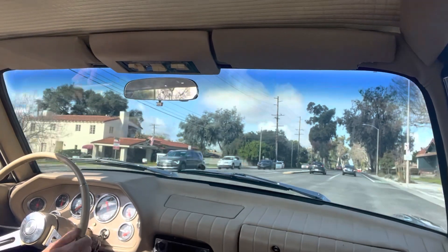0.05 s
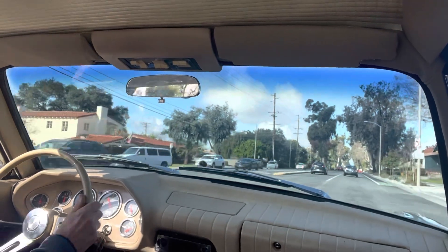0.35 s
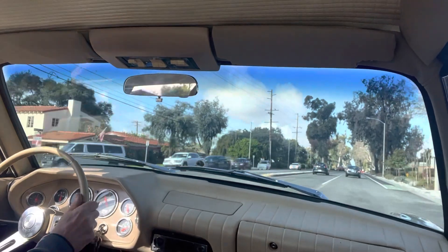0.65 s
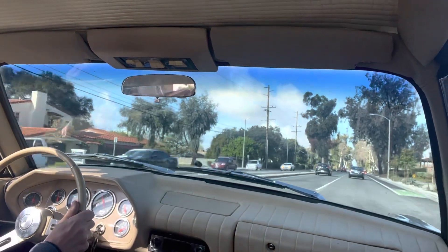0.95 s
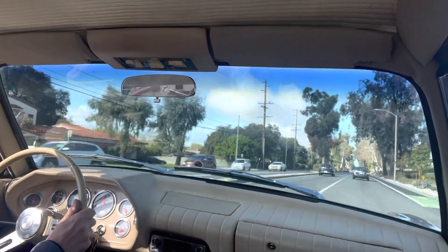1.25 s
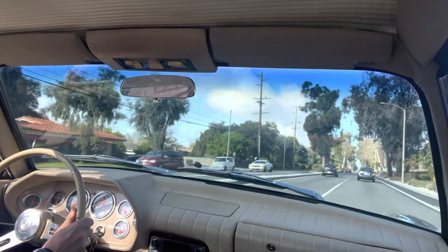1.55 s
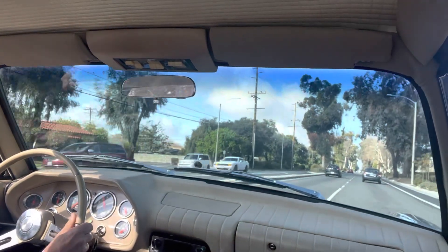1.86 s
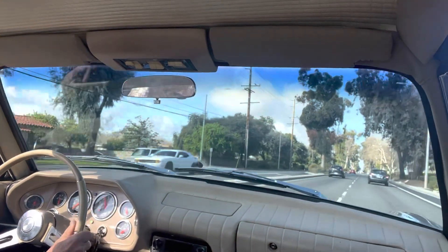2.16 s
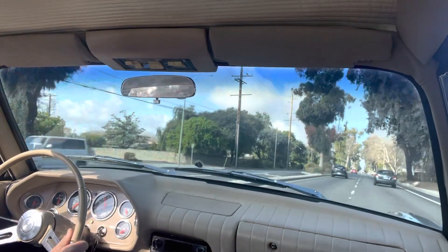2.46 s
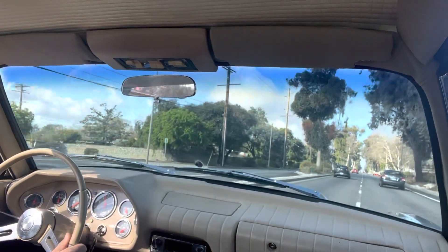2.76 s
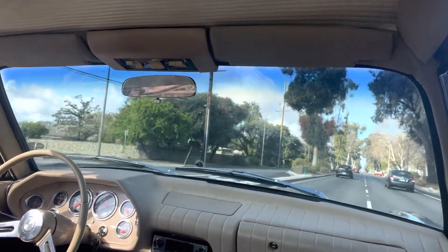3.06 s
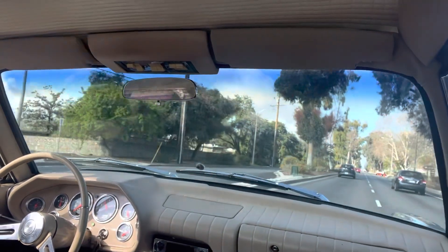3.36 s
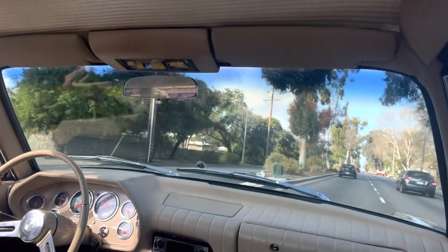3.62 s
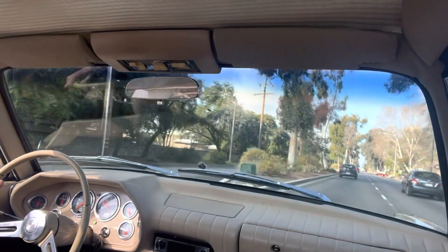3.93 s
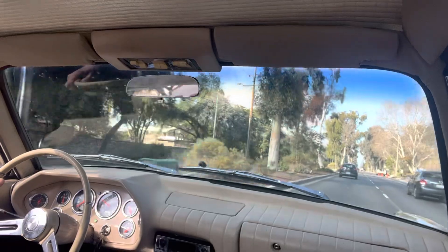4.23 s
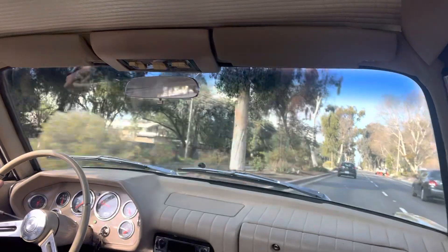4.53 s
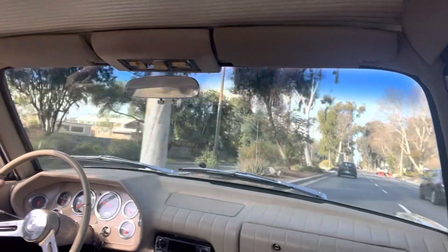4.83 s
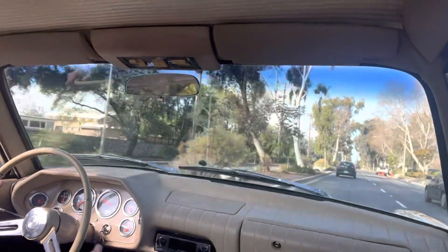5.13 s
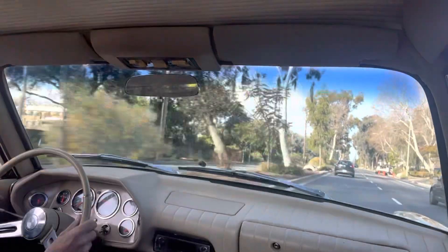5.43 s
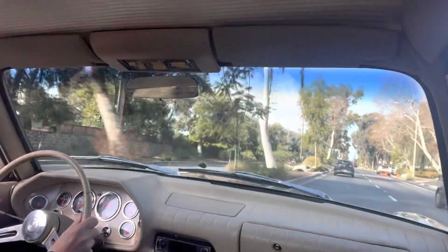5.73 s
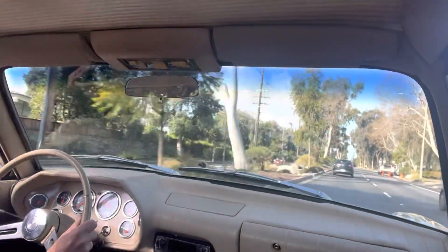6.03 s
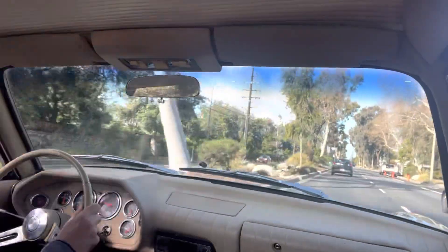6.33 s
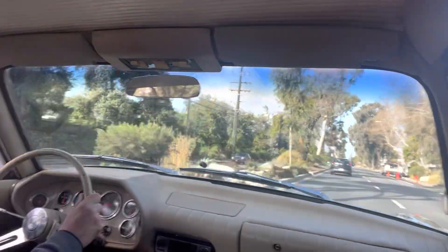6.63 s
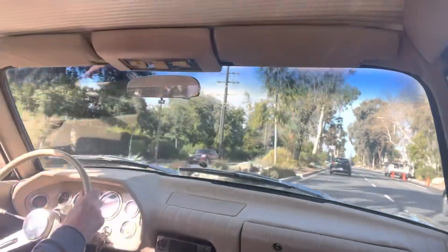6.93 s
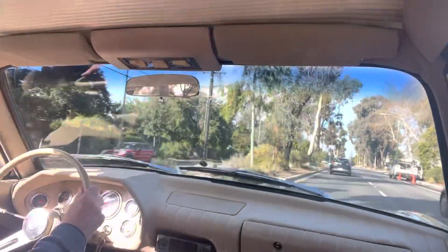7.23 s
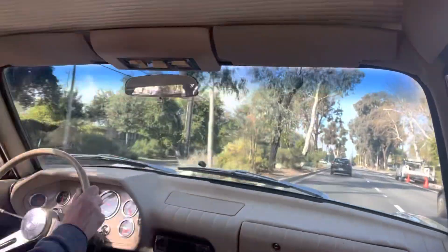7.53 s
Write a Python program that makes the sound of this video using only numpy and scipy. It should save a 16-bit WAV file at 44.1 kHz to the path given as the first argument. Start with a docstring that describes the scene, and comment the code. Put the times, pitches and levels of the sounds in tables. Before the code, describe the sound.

A supercharged V8 accelerates hard, heard from the front seat of an old car. The exhaust booms through the cabin under rushing intake air and a thin rising whine. After three seconds the throttle closes and the revs fall, followed by a quick double whoosh and a hollow thud. The car rolls on with an uneven low rumble, tyre noise and a faint high squeak.

```python
"""A supercharged V8 pulls hard for three seconds, heard inside an old coupe. Exhaust orders boom through
cabin resonances under the blower's whine and the rush of intake air. The throttle closes, the revs fall,
and a short double whoosh ends in a panel thud. The car rolls on with an uneven low rumble, tyre noise
and a faint squeak of something rubbing as the body shakes."""
import sys
import numpy as np
from scipy import signal
from scipy.io import wavfile

SR = 44100
rng = np.random.default_rng(int(sys.argv[2]) if len(sys.argv) > 2 else 0)


def unload_audio(sound):
    """Save the sound as a 16-bit wav file, at the path given as the first command line argument."""
    columns = np.transpose(np.atleast_2d(sound))
    # keep every value between -1 and 1, then stretch to whole-number steps
    steps = np.round(np.clip(columns, -1, 1) * 32767)
    wavfile.write(sys.argv[1], SR, steps.astype(np.int16))


N = 334278

# engine speed in four-stroke cycles; an order is a multiple of it: time_s, cycle_hz
ENGINE_SPEED = [(0, 25.9), (.12, 24.25), (.24, 23.35), (.34, 24.3), (.43, 24.35), (.5, 23.8), (.63, 24.7),
                (.8, 24.6), (.95, 25.3), (1.08, 25.3), (1.22, 25.76), (1.44, 26.04), (1.57, 26.84),
                (1.72, 26.72), (1.85, 27.84), (2.0, 27.8), (2.15, 28.76), (2.3, 29.04), (2.45, 29.9),
                (2.7, 30.72), (2.95, 31.36), (3.07, 31), (3.2, 28.4), (3.3, 26), (3.42, 24.24), (3.9, 19.2),
                (4.15, 16.2), (4.5, 14.3), (5.0, 15.5), (5.5, 15.7), (7.58, 12.6)]
# engine load: time_s, load_db
ENGINE_LOAD = [(0, 1), (.9, 0), (1.3, -1), (1.9, 1.5), (2.5, 1), (2.98, -0.4), (3.25, -10), (3.9, -13),
               (4.15, -23), (5.0, -17), (7.3, -13.5)]
# exhaust pattern of the unevenly firing banks: order, level_db
EXHAUST_ORDERS = [(2, -34), (3, -28), (4, -31), (5, -27), (6, -19), (7, -26), (8, -24), (9, -29),
                  (10, -32.5), (11, -26), (12, -32.5), (13, -29), (14, -36.5), (15, -41), (16, -35.5),
                  (17, -38.5), (18, -43), (19, -39), (20, -37.5), (21, -41.5)]
# orders that follow the load only partly: order, load_share
EXHAUST_LOAD_SHARES = [(3, 0.99), (4, 0.89), (5, 0.86), (6, 0.99)]
# bark midway through the pull: order, boost_db
BARK_BOOSTS = [(8, 10.8), (11, 1.9)]
# cabin response to the exhaust: freq_hz, gain_db
CABIN_RESPONSE = [(30, -4), (45, 17), (58, 14), (72, 8), (82, 3), (94, 4), (108, 6), (122, 2.5), (138, -3),
                  (150, 3.5), (162, -1), (176, -13), (195, -10.5), (213, -11.5), (233, -5), (282, -4),
                  (320, -7), (400, 0), (500, -2.5), (650, -11.5)]
# standing waves, left versus right: freq_hz, phase_rad, pan_db
STEREO_OFFSETS = [(50, 0.13, 1.5), (86, 0.65, 2), (136, 0.37, -5), (168, 0.26, 5), (230, 1.04, -6.5),
                  (295, 0.8, -6.5), (440, 1.88, -4.5), (958, 1.23, -5.5), (3500, 0.77, 4.5)]
# left-right likeness of noise, clipped to +-1 in use: freq_hz, correlation
STEREO_CORRELATION = [(40, 0.74), (70, 0.9), (130, 0.77), (250, 0.47), (400, -0.17), (600, 0.11),
                      (1200, -0.34), (2700, 0.049), (6000, -0.18), (8000, 0.24), (10200, 1), (12500, -1.4)]
# cabin peaks and hollows for airborne noise: centre_hz, width_hz, gain_db
CABIN_PEAKS = [(284, 31, -4), (388.4, 35, 6), (638, 27, -11.5), (719, 19, 2), (839, 166, 6), (940, 56, 1.5),
               (1243, 103, 3), (2030, 210, 3), (2450, 190, 3), (4770, 180, 2.5)]
# engine notes that swell at a resonance: order, centre_hz, width_hz, peak_db, load_share
DRONE_RESONANCES = [(34.17, 954, 100, -33.5, 1.5), (30.4, 940, 29, -35.5, 9), (48, 1262, 90, -45, 1),
                    (18, 284, 30, -35.5, 0), (8.04, 107, 18, -27, 0), (6, 77, 8.1, -31, 0),
                    (5, 65, 14, -25.5, 0)]
# intake roar spectrum: freq_hz, density_db
ROAR_SPECTRUM = [(150, -31), (280, -8), (500, 8), (630, -1.5), (780, -1.5), (950, -1.5), (1250, -6.5),
                 (1600, -10.5), (2500, -15), (4000, -28), (6000, -28)]
# intake hiss spectrum: freq_hz, density_db
HISS_SPECTRUM = [(1500, -8.5), (3000, 5.5), (5000, 0), (7000, 0.5), (9000, -1), (10500, 0.5), (12000, -5),
                 (13000, -3.5)]
# engine bay resonances: centre_hz, gain_db
BAY_MODES = [(510, 3.5), (730, 1.5), (930, -5), (1170, -8)]
# resonances the whine sweeps through: centre_hz, width_hz, gain_db
BLOWER_RESONANCES = [(3070, 140, -2), (3228, 91, 11), (3480, 55, 4)]
# whine spurts and dips as the throttle moves: start_s, attack_s, hold_s, release_s, gain_db
BLOWER_SPURTS = [(.08, .015, .03, .015, 6), (.14, .02, .1, .02, -8), (.305, .015, .11, .03, 13),
                 (.536, .026, .06, .02, 9), (.65, .01, .05, .01, -6), (.72, .03, .09, .02, 9.5),
                 (1.15, .05, .25, .04, 2), (2.7, .2, .15, .06, 7.5), (3.24, .04, .05, .04, 4),
                 (3.34, .04, .04, .03, 8)]
# tyre rumble spectrum: freq_hz, density_db
RUMBLE_SPECTRUM = [(22, -24), (32, -13), (48, -5.5), (68, -3), (100, -9.5), (160, -11), (200, -14.5),
                   (270, -13.5), (330, -24), (420, -19)]
# body resonance in the shudder: centre_hz, width_hz, gain_db
SHUDDER_PEAKS = [(100, 23, 13)]
# wind and tyre noise spectrum: freq_hz, density_db
RUSH_SPECTRUM = [(330, -13.5), (460, -1), (650, -9), (900, -8), (1200, -11), (1700, -18.5), (2500, -19.5),
                 (4000, -26), (6000, -33), (7700, -34), (10000, -34), (11500, -33.5), (13000, -41)]
# loudest squeaks: time_s, peak_db
SQUEAK_CHIRPS = [(.202, -46), (1.38, -50), (1.48, -45), (1.56, -48), (3.475, -50), (3.525, -44),
                 (3.615, -46), (3.665, -42), (3.715, -44), (3.765, -43.5), (3.87, -56), (4.29, -62),
                 (4.365, -49), (5.09, -52), (5.15, -50.5), (5.22, -52)]
# fainter squeaking: start_s, hold_s, level_db
SQUEAK_BOUTS = [(-.3, 1.87, -54), (3.2, 0.76, -56), (4.55, 1.5, -57.5)]
# air at the closing throttle: start_s, attack_s, release_s, pitch_hz, width_hz, level_db
WHISTLE_BANDS = [(2.1, 1, 0.4, 2550, 315, -43.5), (3.05, .025, 0.033, 2970, 70, -35.5)]
# wavering notes on the overrun: order, level_db
OVERRUN_ORDERS = [(2, -28.5), (3, -25), (5, -27.5)]
# loudest swells of the low rumble, near 65 Hz: time_s, level_db, pitch_hz
RUMBLE_SWELLS = [(3.46, -12.5, 66.2), (3.76, -21, 66), (3.86, -15, 72.8), (3.94, -14, 60.5),
                 (4.09, -22, 63.2), (4.27, -19, 58), (4.4, -25, 64.8), (4.54, -20, 64), (4.7, -19.5, 53),
                 (4.92, -18, 66), (5.04, -22, 64), (5.19, -15, 62), (5.37, -19.5, 64.8), (5.55, -16.5, 68),
                 (5.79, -18, 67.3), (6.07, -22, 70.1), (6.3, -22, 64.5), (6.47, -21, 67), (6.7, -17.5, 60),
                 (6.92, -20, 67.2), (7.13, -25, 72.6), (7.35, -17, 63), (7.47, -15.5, 72)]
# parts of the double whoosh: start_s, attack_s, hold_s, release_s, level_db, lowpass_hz
WHOOSH_BURSTS = [(3.955, 0.056, 0.023, 0.022, -28.5, 3200), (3.995, 0.0024, 0.0022, 0.0048, -39, 9000),
                 (4.053, .005, .02, .01, -27.5, 16000), (4.06, .02, .056, .036, -18.7, 16000),
                 (4.14, .02, .016, .026, -28.5, 3000)]
# whoosh spectrum: freq_hz, density_db
WHOOSH_SPECTRUM = [(110, -19), (160, 0), (270, -0.5), (400, -9.5), (750, -16.5), (1100, -14), (1700, -16.5),
                   (2500, -18.5), (3500, -18), (4700, -25), (6000, -26.5), (10500, -34.5), (13000, -38)]
# whoosh ringing: centre_hz, width_hz, gain_db
WHOOSH_PEAKS = [(167, 25, -1), (250, 19, 4), (370, 18, 4), (507, 27, 14.5), (595, 50, -1), (717, 55, 10.5),
                (860, 42, -2), (1136, 40, 6), (1760, 130, -3.5), (2160, 150, -4), (2390, 46, 2),
                (2970, 280, -3), (3550, 69, 6), (4430, 130, 11), (4890, 360, 8)]
# thud after the whoosh, then softer road bumps: start_s, level_db
PANEL_KNOCKS = [(4.148, -15), (4.87, -27), (6.635, -27), (7.441, -24)]
# hollow panel: pitch_hz, level_db, t60_s
PANEL_MODES = [(156, 1, 0.17), (245, -0.5, 0.25), (294, -5.5, .16)]

# level laws: level_db (at PULL_CYCLE_HZ and 0 dB load), db_per_octave, load_share
ROAR_LAW, HISS_LAW = (-32, 9.5, 0.7), (-44.5, 16.2, 0.34)
KNOCK_LAW, WHINE_LAW = (-38, 15, 1.9), (-57.5, 1, 0.26)
PULL_CYCLE_HZ = 25

# envelopes: start_s, attack_s, hold_s, release_s
BARK = (1.49, 0.12, 0.31, 0.65)
SHUDDER = (2.57, 0.57, 0.098, 0.64)
THROTTLE_LIFT = (2.73, 0.24, 1.2, 0.48)
SQUEAL = (3.06, .08, 0.32, 0.34)
OVERRUN = (3.2, 0.19, 0.526, .04)

TIME_S = np.arange(N) / SR
LEFT_RIGHT = np.array([[.5], [-.5]])


def from_db(db):
    """Decibels to gain."""
    return np.exp(np.asarray(db) * (np.log(10) / 20))


def unit_rms(x):
    """Scale to rms 1."""
    return x / np.sqrt(np.mean(x ** 2) + 1e-20)


def in_time(curve):
    """A time curve at every sample."""
    return np.interp(TIME_S, *np.transpose(curve))


def at_hz(spectrum, hz):
    """Each value column, interpolated over log frequency."""
    freq_hz, *columns = np.transpose(spectrum)
    return [np.interp(np.log(hz), np.log(freq_hz), column) for column in columns]


def envelope(start_s, attack_s, hold_s, release_s):
    """Trapezoid from 0 to 1 and back."""
    t = TIME_S - start_s
    return np.clip(np.minimum(t / attack_s, 1 + (attack_s + hold_s - t) / release_s), 0, 1)


def drift(rate_hz):
    """Slow random wander; rms 1."""
    r = np.exp(-80 * np.pi * rate_hz / SR)  # one step per 40 samples
    slow = signal.lfilter([1], [1, -2 * r, r * r], rng.standard_normal(N // 40 + 2002))[2000:]
    return np.interp(np.arange(N) / 40, np.arange(len(slow)), unit_rms(slow))


def phase_rad(hz):
    """Running phase of a changing frequency."""
    return 2 * np.pi * np.cumsum(hz) / SR


def nearness(hz, centre_hz, width_hz):
    """1 on a resonance, falling off either side."""
    return 1 / (1 + (2 * (hz - centre_hz) / width_hz) ** 2)


def peaks(x, table):
    """Chain of resonant peaks and hollows."""
    for hz, width_hz, db in table:
        a, g = np.pi * width_hz / SR, from_db(db / 2)
        c = -2 * np.cos(2 * np.pi * hz / SR)
        x = signal.lfilter([1 + a * g, c, 1 - a * g], [1 + a / g, c, 1 - a / g], x)
    return x


def tone(angle_rad, hz, level_db):
    """A partial; standing waves offset its phase and level between channels."""
    apart_rad, pan_db = at_hz(STEREO_OFFSETS, hz)
    amplitude = np.sqrt(2) * from_db(level_db + LEFT_RIGHT * pan_db)
    return amplitude * np.sin(angle_rad + LEFT_RIGHT * apart_rad + rng.uniform(0, 2 * np.pi))


def bandpass(x, low_hz, high_hz):
    """Butterworth band filter."""
    return signal.sosfilt(signal.butter(2, [low_hz, high_hz], "band", fs=SR, output="sos"), x)


def noise(spectrum, flicker_db):
    """Stereo noise in third octaves, each flickering on its own; rms 1."""
    edges_hz = 22 * 2 ** (np.arange(29) / 3)
    white = rng.standard_normal((2, 2, N))
    mids = sides = 0
    for k, (low_hz, high_hz) in enumerate(zip(edges_hz, edges_hz[1:])):
        if spectrum[0][0] < high_hz and low_hz < spectrum[-1][0]:
            hz = np.sqrt(low_hz * high_hz)
            mid, side = bandpass(white[k % 2], low_hz, high_hz)
            correlation = np.clip(at_hz(STEREO_CORRELATION, hz)[0], -1, 1)
            gain = from_db(at_hz(spectrum, hz)[0] + flicker_db * drift(20))
            mids += np.sqrt(1 + correlation) * gain * mid
            sides += np.sqrt(1 - correlation) * gain * side
    return unit_rms(np.array([mids + sides, mids - sides]))


def narrow_noise(hz, width_hz, shape=N):
    """Breathy band around one pitch; rms 1."""
    return unit_rms(bandpass(rng.standard_normal(shape), hz - width_hz / 2, hz + width_hz / 2))


def effort_db(law):
    """Level that grows with engine speed and load."""
    level_db, db_per_octave, load_share = law
    octaves = np.log2(in_time(ENGINE_SPEED) / PULL_CYCLE_HZ)
    return level_db + db_per_octave * octaves + load_share * in_time(ENGINE_LOAD)


def road_gain(cruise_db, db_per_octave):
    """Gain that follows road speed: rising until the lift, then steady."""
    speed_share = np.interp(TIME_S, [0, THROTTLE_LIFT[0]], [0.8, 1])
    return from_db(cruise_db + db_per_octave * np.log2(speed_share))


def exhaust(cycle_hz, cycle_rad, load_db, uneven_db=2, jitter_rad=0.16, dull_db_per_octave=3.5,
            beat_hz=2.08, beat_crest_s=1.88, beat_depth=0.55):
    """Orders swell across cabin resonances; a shut throttle dulls them; the lowest beats."""
    growl = 1 + .12 * drift(35)
    tilt_db_per_octave = -dull_db_per_octave * envelope(*THROTTLE_LIFT)
    beat_rad = 2 * np.pi * beat_hz * (TIME_S - beat_crest_s)
    beat = np.abs(1 + beat_depth * np.exp(1j * beat_rad)) / np.hypot(1, beat_depth)
    load_shares, barks_db = dict(EXHAUST_LOAD_SHARES), dict(BARK_BOOSTS)
    out = 0
    for order, order_db in EXHAUST_ORDERS:
        hz = order * cycle_hz
        drive_db = load_shares.get(order, 1) * load_db + barks_db.get(order, 0) * envelope(*BARK)
        colour_db = order_db + at_hz(CABIN_RESPONSE, hz)[0] + tilt_db_per_octave * np.log2(order / 4)
        # cylinders nearly cancel in high orders, so small misfires make those stagger
        roughness = np.clip((order / 10) ** 2, 1, 3)
        stagger_rad = jitter_rad * roughness * drift(9)
        flutter_db = uneven_db * np.sqrt(roughness) * drift(8.8)
        note = tone(order * cycle_rad + stagger_rad, hz, drive_db + colour_db + flutter_db)
        out += note * (beat if order == 2 else 1)  # order 2: once per crankshaft turn
    return growl * out


def drones(cycle_hz, cycle_rad, load_db, waver_rad=0.25):
    """Wavering orders swell at a resonance: howls under load, hums at low revs."""
    out = 0
    for order, centre_hz, width_hz, peak_db, load_share in DRONE_RESONANCES:
        hz = order * cycle_hz
        level_db = peak_db + load_share * np.minimum(load_db, 0) + 2 * drift(14)
        note = tone(order * cycle_rad + waver_rad * drift(6.8), hz, level_db)
        out += nearness(hz, centre_hz, width_hz) * note
    return out


def intake(cycle_rad, pulse_depth=0.051):
    """Air roar and hiss pulse with the firings and the crankshaft's turns."""
    pulsing = 1 + pulse_depth * (np.sin(8 * cycle_rad) + np.sin(2 * cycle_rad))
    roar = from_db(effort_db(ROAR_LAW)) * noise(ROAR_SPECTRUM, flicker_db=2.5)
    hiss = from_db(effort_db(HISS_LAW)) * noise(HISS_SPECTRUM, flicker_db=1)
    return (roar + hiss) * pulsing


def cylinder_knock(cycle_rad, cylinders=8, width_hz=68, spread_db=4, max_lag_s=0.0017):
    """Each cylinder rings the engine bay with its own strength and timing."""
    firing_count = np.floor(cycle_rad * cylinders / (2 * np.pi)).astype(int)
    onsets = np.flatnonzero(np.diff(firing_count))
    cylinder = firing_count[onsets] % cylinders
    impulses = np.zeros((2, N))
    for channel in impulses:
        lags = (rng.uniform(0, max_lag_s, cylinders)[cylinder] * SR).astype(int)
        level_db = rng.normal(0, spread_db, cylinders)[cylinder] + rng.normal(0, spread_db, len(onsets))
        channel[np.minimum(onsets + lags, N - 1)] = from_db(level_db)
    r = np.exp(-np.pi * width_hz / SR)
    ringing = 0
    for k, (hz, db) in enumerate(BAY_MODES):
        poles = [1, -2 * r * np.cos(2 * np.pi * hz / SR), r * r]
        ringing += (-1) ** k * from_db(db) * signal.lfilter([1, 0, -1], poles, impulses)
    return from_db(effort_db(KNOCK_LAW)) * unit_rms(ringing)


def blower(cycle_hz, order=125, stall_s=3.05, catch_s=.3, flutter_db=2.8):
    """The belt-driven impeller sings one thin note that breaks up as its flow stalls after the lift."""
    hz = order * cycle_hz
    stalled = TIME_S > stall_s
    ring_db = sum(db * nearness(hz, centre_hz, width_hz) for centre_hz, width_hz, db in BLOWER_RESONANCES)
    ring_db *= np.where(stalled, 0.48, 1)  # stalled flow rings less
    spurt_db = sum(db * envelope(*shape) for *shape, db in BLOWER_SPURTS)
    slack_db = -2 * np.clip(1 - (TIME_S / catch_s) ** 2, 0, 1)  # weak until the revs pick up
    wobble = 0.00208 * drift(40) + 0.0092 * stalled * drift(110)
    level_db = effort_db(WHINE_LAW) + ring_db + spurt_db + slack_db + flutter_db * drift(25)
    return tone(phase_rad(hz * (1 + wobble)), hz, level_db)


def rumble(shudder_db=-23):
    """Tyres shake the body; it shudders as the drive goes slack."""
    shaking = noise(RUMBLE_SPECTRUM, flicker_db=1.7)
    rolling = road_gain(cruise_db=-22.5, db_per_octave=11) * shaking
    return rolling + from_db(shudder_db) * envelope(*SHUDDER) * peaks(shaking, SHUDDER_PEAKS)


def rush():
    """Wind and tyre noise leak through the glass."""
    return road_gain(cruise_db=-36.5, db_per_octave=26) * noise(RUSH_SPECTRUM, flicker_db=1.7)


def squeak(chirp_sigma_s=0.011, shake_hz=19, fade_s=0.26, squeal_db=-54.5):
    """Something rubs as the car shakes: very high chirps, and a lower squeal after the lift."""
    chirps = sum(from_db(db) * np.exp(-.5 * ((TIME_S - s) / chirp_sigma_s) ** 2)
                 for s, db in SQUEAK_CHIRPS)
    shaking = np.maximum(np.sin(phase_rad(shake_hz * (1 + 0.1092 * drift(2.66)))), 0) ** 2
    bouts = sum(from_db(db) * envelope(s, fade_s, hold_s, fade_s) for s, hold_s, db in SQUEAK_BOUTS)
    faint = bouts * from_db(5.1 * drift(5.6)) * (0.31 + 0.69 * shaking)
    squeal = from_db(squeal_db) * envelope(*SQUEAL) * narrow_noise(hz=10300, width_hz=280)
    return (chirps + faint) * narrow_noise(hz=10490, width_hz=350) + squeal


def throttle_whistles():
    """Air squeezed past the throttle rings in narrow bands."""
    return sum(from_db(db) * envelope(start_s, attack_s, 0, release_s) * narrow_noise(hz, width_hz, (2, N))
               for start_s, attack_s, release_s, hz, width_hz, db in WHISTLE_BANDS)


def overrun(cycle_hz, cycle_rad, uneven_db=2.5, waver_rad=.35):
    """The car drives the closed engine until the gear change; low orders waver."""
    notes = 0
    for order, db in OVERRUN_ORDERS:
        angle_rad = order * cycle_rad + waver_rad * drift(9.1)
        notes += tone(angle_rad, order * cycle_hz, db + uneven_db * drift(14))
    return envelope(*OVERRUN) * notes


def rumble_swells(sigma_s=0.014):
    """The low rumble swells briefly at irregular times."""
    return sum(np.exp(-.5 * ((TIME_S - s) / sigma_s) ** 2) * tone(2 * np.pi * hz * TIME_S, hz, db)
               for s, db, hz in RUMBLE_SWELLS)


def whoosh(rasp_hz=98.6, rasp_depth=0.15, pan_db=-1):
    """Rasping, ringing noise, slightly right: weak and dull, then strong and bright."""
    flutter_db = 1.4 * drift(130)
    rasp = 1 + rasp_depth * np.sin(phase_rad(rasp_hz * (1 + 0.101 * drift(36))))
    air = peaks(noise(WHOOSH_SPECTRUM, flicker_db=.8), WHOOSH_PEAKS)
    out = 0
    for *shape, db, lowpass_hz in WHOOSH_BURSTS:
        dulled = signal.sosfilt(signal.butter(1, lowpass_hz, fs=SR, output="sos"), air)
        out += from_db(db + flutter_db) * envelope(*shape) * dulled
    return out * rasp * from_db(pan_db * LEFT_RIGHT)


def thuds():
    """Each knock rings a hollow panel."""
    t = np.arange(SR // 2) / SR
    ring = sum(from_db(db - 60 * t / t60_s) * np.sin(2 * np.pi * hz * t) for hz, db, t60_s in PANEL_MODES)
    out = np.zeros(N + SR)
    for start_s, db in PANEL_KNOCKS:
        start = int(start_s * SR)
        out[start:start + len(t)] += from_db(db) * ring
    return out[:N]


def cabin(x, echo_db=-11, t60_s=0.096, echoes=24):
    """Standing waves colour the noise; reflections off glass and trim comb its treble."""
    out = peaks(x, CABIN_PEAKS)
    treble = bandpass(out, low_hz=1200, high_hz=6000)
    for channel in range(2):
        for delay_s in rng.uniform(.003, .04, echoes):
            lag = int(delay_s * SR)
            gain = rng.choice([-1, 1]) * from_db(echo_db - 60 * delay_s / t60_s)
            out[channel, lag:] += gain * treble[channel, :-lag]
    return out


def scene():
    """Stereo mix at the front seat."""
    cycle_hz, load_db = in_time(ENGINE_SPEED), in_time(ENGINE_LOAD)
    cycle_rad = phase_rad(cycle_hz)
    engine = exhaust(cycle_hz, cycle_rad, load_db) + drones(cycle_hz, cycle_rad, load_db)
    engine += overrun(cycle_hz, cycle_rad)
    swells = rumble_swells()
    airborne = cabin(intake(cycle_rad) + cylinder_knock(cycle_rad) + rush() + whoosh())
    whistles = blower(cycle_hz) + throttle_whistles()
    return engine + rumble() + swells + thuds() + airborne + whistles + squeak()


def record(dry):
    """Steep low-pass."""
    cutoff_hz = 12900
    return signal.sosfilt(signal.ellip(10, .1, 90, cutoff_hz, fs=SR, output="sos"), dry)


dry = scene()
out = record(dry)
unload_audio(out)
```